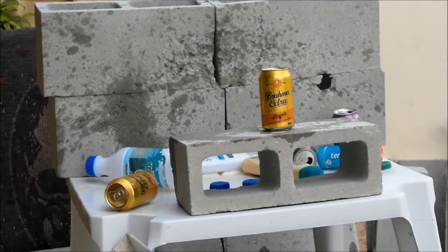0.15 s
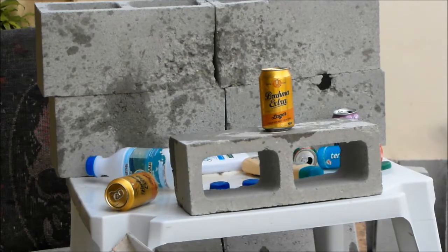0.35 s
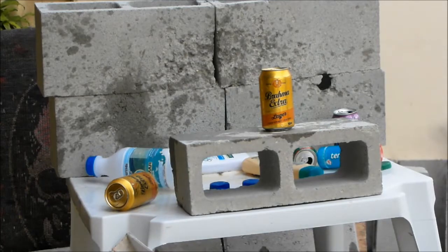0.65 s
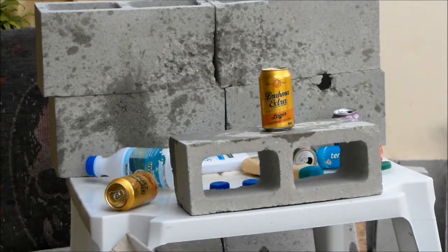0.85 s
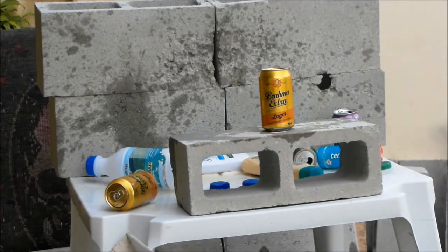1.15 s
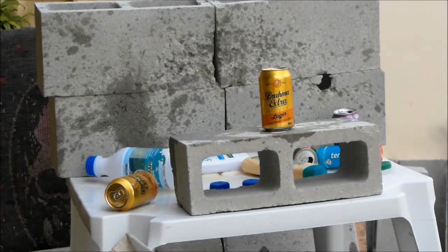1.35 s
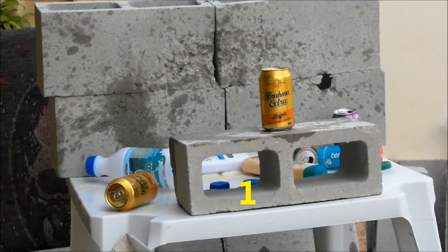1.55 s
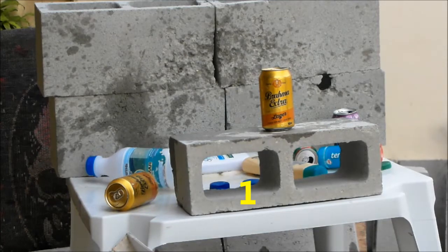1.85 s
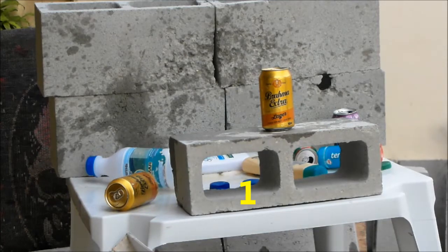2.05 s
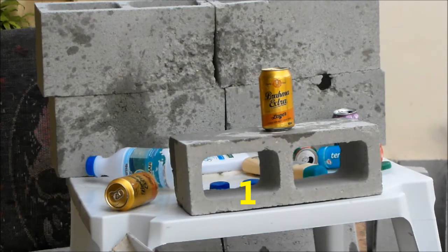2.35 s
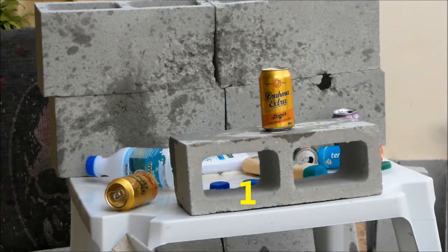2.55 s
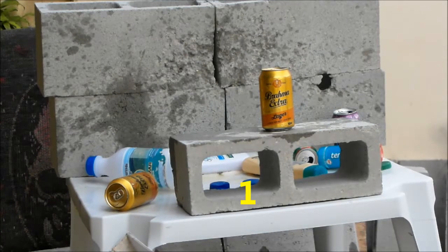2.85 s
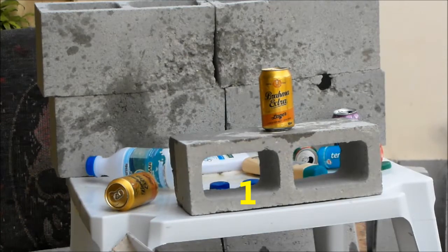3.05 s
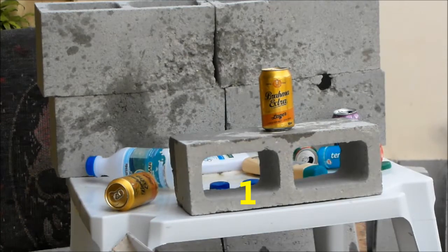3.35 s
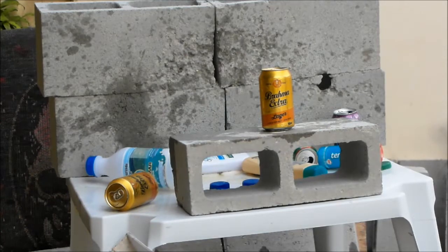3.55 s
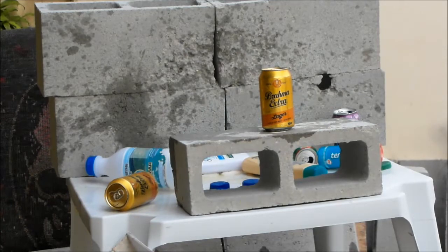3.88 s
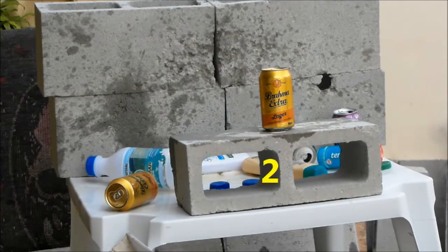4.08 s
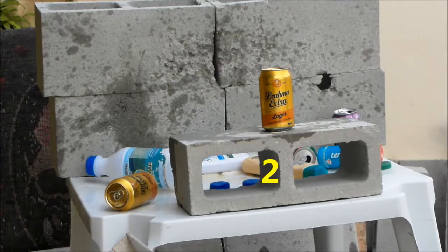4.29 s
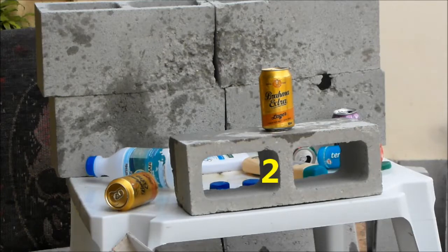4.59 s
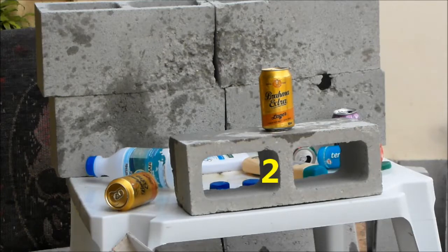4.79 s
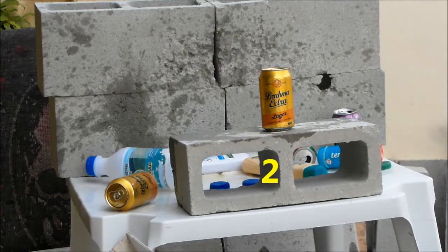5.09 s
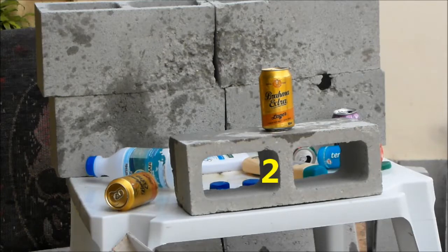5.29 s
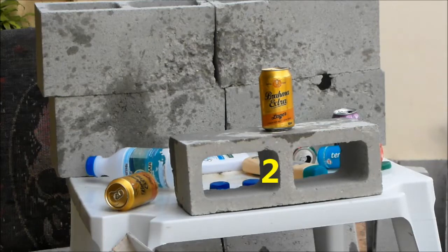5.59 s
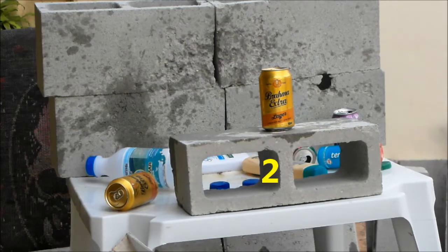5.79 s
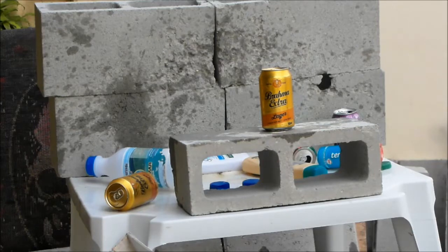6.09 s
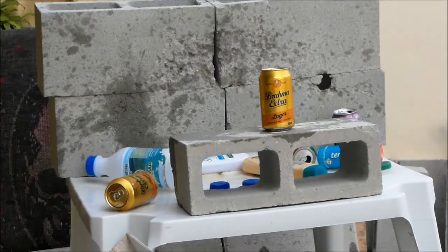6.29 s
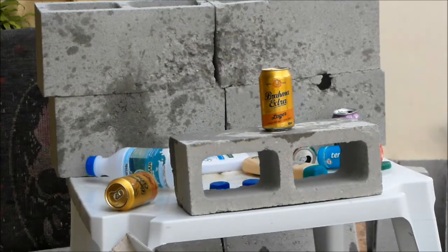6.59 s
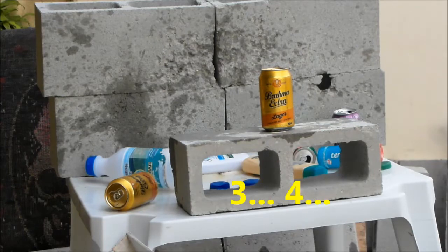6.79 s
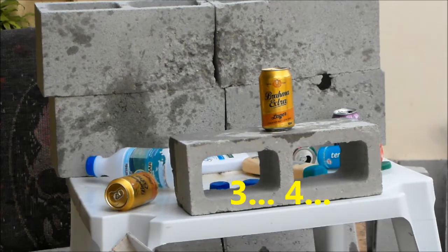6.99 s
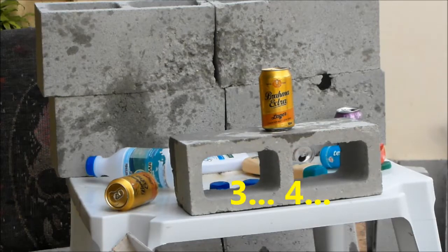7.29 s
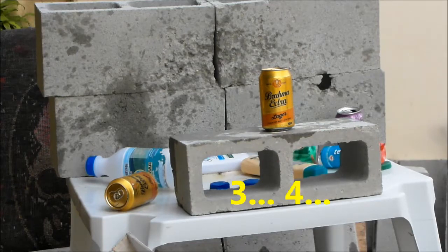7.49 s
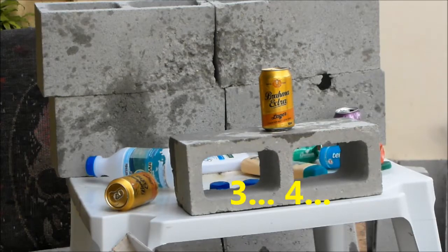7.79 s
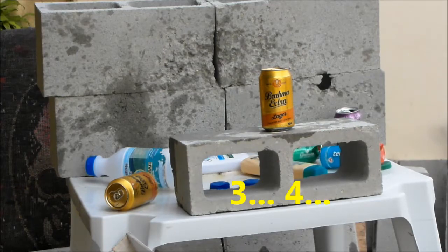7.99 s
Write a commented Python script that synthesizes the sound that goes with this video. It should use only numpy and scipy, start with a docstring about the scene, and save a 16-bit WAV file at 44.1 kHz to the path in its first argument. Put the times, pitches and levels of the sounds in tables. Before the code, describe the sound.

A quiet walled yard outdoors: soft traffic roar leaning slightly right, a low engine drone sinking in pitch, a faint hoot, and a sparrow chirp at 0.7 s. At 1.3 s a small steel click leads straight into a very loud, clipped air pistol crack with a short low punch, hissing gas, a gritty pellet hit and dense echoes off concrete, fading within under a second. A metal click comes at 2.3 s, a chirp at 2.8 s, and a barely audible thin whine joins the drone. The second shot and hit land at 4.1 s. The engine swells near 6 s. Clicks and dull knocks surround a third shot at 6.7 s; the fourth, brightest, strikes at 7.3 s with a metallic hit. From 7.5 s hard chips tick and an empty can clatters, crinkling and ringing in uneven bounces until the end at about 8.1 s.

```python
"""Street noise and a low engine drone come first, with faint hoots and sparrow chirps. An air pistol fires four
times in a walled concrete yard, close to a stereo microphone; the loudest moments clip flat; a thin whine joins
after the first shot. Each shot is a filtered pressure jump with dense echoes, a low punch, hissing gas and
cracks off flat walls. Metal parts tick as filtered noise bursts, three pellet hits splash and ring; near the
end small chips tick and an empty can tumbles as a set of fading sine tones."""
import sys
import numpy as np
from scipy import signal
from scipy.fft import rfft, irfft, next_fast_len
from scipy.io import wavfile
from scipy.ndimage import uniform_filter1d

SR = 44100
rng = np.random.default_rng(int(sys.argv[2]) if len(sys.argv) > 2 else 0)


def unload_audio(sound):
    """Save the sound as a 16-bit wav file, at the path given as the first command line argument."""
    columns = np.transpose(np.atleast_2d(sound))
    # keep every value between -1 and 1, then stretch to whole-number steps
    steps = np.round(np.clip(columns, -1, 1) * 32767)
    wavfile.write(sys.argv[1], SR, steps.astype(np.int16))


N = 358974
T = np.arange(N) / SR  # time in s
PRESSURE_JUMP = np.eye(1, 2048)[0]  # a single-sample click

# Spectrum shape of the muzzle blast and pellet cracks: pitch_hz, relative level_db (per Hz)
BLAST_SPECTRUM = [(35, -60), (60, -26.5), (205, -13.5), (247, -12), (376, -10.5), (442, -11), (485, -8.5),
                  (641, -12.5), (790, -6.5), (1230, -7.5), (2580, -7), (3410, -5.5), (6100, -9.5),
                  (9930, -4), (15400, -22)]
# Spectrum shape of clicking steel and crinkling can wall: pitch_hz, relative level_db (per Hz)
METAL_SPECTRUM = [(290, -57), (500, -26), (545, -32), (737, -17.5), (1040, -11.5), (3090, -6.5), (4620, -3),
                  (8570, 1.5), (14400, -5.5), (15400, -14.5)]
# Stereo balance of the yard: pitch_hz, left_minus_right_db
YARD_BALANCE = [(60, -3.5), (110, -4), (200, -3.5), (380, 0), (700, -1.5), (1290, 0), (2380, -1), (4400, 0),
                (8120, -4.0), (15000, -3.5)]


def undb(db):
    """Turns decibels into a plain gain."""
    return 10 ** (np.asarray(db) / 20)


def unit(x):
    """Scales a sound to an average (RMS) level of 1."""
    return x / np.sqrt(np.mean(x ** 2))


def add(track, start_s, x):
    """Mixes a sound into a track at a time, cutting what runs past the end."""
    i = min(int(start_s * SR), N)
    track[..., i:i + x.shape[-1]] += x[..., :N - i]


def on_log(hz, table):
    """Reads a (pitch, value) table along log frequency."""
    table_hz, values = np.transpose(table)[:2]
    return np.interp(np.log(np.maximum(hz, 1)), np.log(table_hz), values)


def colour(x, table, tilt_db=0):
    """Filters with a table's spectrum, tilted in dB per octave; the filter never sounds early."""
    hz = np.fft.rfftfreq(2048, 1 / SR)
    gain = undb(on_log(hz, table) + tilt_db * np.log2(np.maximum(hz, 50) / 2000))
    # folding the cepstrum (the transform of the log gain) packs the energy at the start
    cepstrum = irfft(np.log(gain))
    cepstrum[1:1024] *= 2
    cepstrum[1025:] = 0
    response = irfft(np.exp(rfft(cepstrum)))
    return signal.fftconvolve(x, response / np.sqrt(np.sum(response ** 2)))[:len(x)]


def burst(t60, size=4096):
    """Noise that starts at once and fades by 60 dB in t60 seconds, energy 1."""
    x = rng.standard_normal(size) * undb(-60 * T[:size] / t60)
    return x / np.sqrt(np.sum(x ** 2))


def crack(hz, cycles):
    """A sine that starts at once and dies by a factor e every few cycles, peak near 1."""
    turns = T[:512] * hz
    return np.sin(2 * np.pi * turns) * np.exp((.25 - turns) / cycles)


def ring(modes, centre_hz, octaves):
    """A blow on a body: tones near the centre answer most, a little differently each time."""
    hz, db, t60 = np.transpose(modes)[:, :, None]
    level_chance, pitch_chance = rng.standard_normal((2, len(hz), 1))
    t = T[:16384]
    # a mode that lies the given octaves from the centre is 6 dB weaker
    distance = np.log2(hz / centre_hz) / octaves
    gain = undb(db + 2 * level_chance - 6 * distance ** 2 - 60 * t / t60)
    tones = np.sin(2 * np.pi * hz * (1 + 0.0039 * pitch_chance) * t)
    return np.sum(gain * tones, axis=0)


def walk(rate):
    """Random levels held 1 / rate seconds and smoothed twice; spread near 1."""
    hold = int(SR / rate)
    steps = np.repeat(rng.standard_normal(N // hold + 1), hold)
    return 1.3 * uniform_filter1d(uniform_filter1d(steps, hold), hold)[:N]


def pair(size, balance):
    """Spectra of left and right noise, alike in the bass, unrelated in the treble."""
    # Likeness of left and right: pitch_hz, likeness (0 to 1)
    likeness = [(60, 0.66), (130, 1), (290, 0.83), (640, 0.87), (1410, 0.78), (3100, 0.53), (6810, 0.06),
                (15000, 0.01)]
    hz = np.fft.rfftfreq(size, 1 / SR)
    same = np.clip(on_log(hz, likeness), 0, 1)
    mid, side = rfft(rng.standard_normal((2, size)))
    sign = np.array([[1], [-1]])
    noise = mid * np.sqrt((1 + same) / 2) + sign * side * np.sqrt((1 - same) / 2)
    return hz, noise * undb(sign * on_log(hz, balance) / 2)


def yard(x, size=32768):
    """Dense echoes between hard walls: each half octave dies at its own pace, near walls first."""
    # How long the echoes last: pitch_hz, t60_s (time to fade by 60 dB)
    echo_times = [(80, 0.19), (250, 0.35), (600, 0.64), (1500, 0.61), (4000, 0.8), (8000, 0.69),
                  (14000, 0.47)]
    early_db, early_share = 2, 0.36  # near walls: strength, and their fade as a share of the yard's
    fill_s, fill_start = 0.018, 0.64  # the echoes thicken at this pace, from this share
    hz, noise = pair(size, YARD_BALANCE)
    echoes, t = 0, T[:size]
    for centre in 40 * np.sqrt(2) ** np.arange(19):
        share = np.clip(1 - np.abs(2 * np.log2(np.maximum(hz, 1) / centre)), 0, 1)
        t60 = on_log(centre, echo_times)
        fade = undb(-60 * t / t60) + undb(early_db - 60 * t / t60 / early_share)
        echoes = echoes + irfft(noise * share) * fade
    thickening = 1 - (1 - fill_start) * np.exp(-t / fill_s)
    return signal.fftconvolve(x[None], echoes * thickening, axes=1)


def street():
    """Traffic roar made of noise octaves that flicker on their own, over a smooth hiss."""
    # Roar level over time: time_s, level_db
    roar_levels = [(0, -55.5), (.84, -59), (1.9, -54), (3.2, -56.5), (4.1, -56.5), (4.8, -52), (6.6, -51.5),
                   (8.14, -60.5)]
    # Spectrum shape of the roar: pitch_hz, relative level_db (per Hz)
    roar_spectrum = [(21, -29.5), (35, -5), (70, -6), (120, -11), (226, -17), (551, -18), (852, -18),
                     (922, -17.5), (1920, -25), (2590, -27.5), (4000, -36), (5200, -63), (8800, -120)]
    # Spectrum shape of the hiss: pitch_hz, relative level_db (per Hz)
    hiss_spectrum = [(880, -28), (1500, -6), (2860, -8.5), (3210, -6), (4390, -7), (6170, -7.5), (7140, -8),
                     (13700, -9), (15400, -17)]
    # Stereo balance of the street: pitch_hz, left_minus_right_db
    street_balance = [(60, 2), (110, -0.5), (200, -2), (380, 0.5), (700, -0.5), (1290, 0.5), (2380, 0.5),
                      (4400, 0.5), (8120, -1), (15000, 1.5)]
    size = next_fast_len(N)
    hz, noise = pair(size, street_balance)
    roar = 0
    for centre in 30 * 2. ** np.arange(8):
        share = np.clip(1 - np.abs(np.log2(np.maximum(hz, 1) / centre)), 0, 1)
        octave = irfft(noise * share * undb(on_log(hz, roar_spectrum)), size)[:, :N]
        roar = roar + octave * undb(1.2 * walk(6))
    hz, noise = pair(size, street_balance)
    hiss = irfft(noise * undb(on_log(hz, hiss_spectrum)), size)[:, :N]
    roar_gain = undb(np.interp(T, *np.transpose(roar_levels)))
    return unit(roar) * roar_gain + unit(hiss) * undb(-62)


def engine():
    """A low firing tone and its overtones at whole multiples, all wavering."""
    # The engine over time: time_s, firing_hz, level_db
    engine_course = [(0, 68.6, -58), (.3, 66, -64), (.6, 47.26, -59.5), (1.2, 38.2, -61), (1.8, 38.55, -67),
                     (2.5, 43.1, -72), (2.75, 44.05, -58), (3.201, 48.8, -58.5), (3.8, 52.23, -58.5),
                     (4.02, 53.4, -50), (4.501, 55.2, -59.5), (5.17, 55.92, -59.5), (5.92, 51.74, -46),
                     (6.14, 51.9, -52), (6.32, 47.6, -45), (6.57, 43, -53), (7.19, 46.07, -53.5),
                     (8.14, 48.5, -49.5)]
    # Firing tone and its overtones in order: relative level_db
    overtones = [1, -13.5, -15, -25.5, -22.5]
    s, hz, db = np.transpose(engine_course)
    phase = 2 * np.pi * np.cumsum(np.interp(T, s, hz) * (1 + .01 * walk(9.3))) / SR
    tone = 0
    for k, order_db in enumerate(overtones):
        tone = tone + undb(order_db + 1.2 * walk(12.0)) * np.sin((k + 1) * phase)
    return np.sqrt(2) * tone * undb(np.interp(T, s, db))


def whine():
    """A thin sine above the drone, wavering in pitch and level."""
    # The whine over time: time_s, pitch_hz, level_db
    whine_course = [(2.5, 220, -75.5), (3.2, 232, -70.5), (4, 243, -72.5), (5.5, 248, -80), (6.3, 251, -65),
                    (7, 250, -76), (8.14, 252, -69)]
    s, hz, db = np.transpose(whine_course)
    phase = 2 * np.pi * np.cumsum(np.interp(T, s, hz) * (1 + 0.0033 * walk(8))) / SR
    level_db = np.interp(T, s, db, left=-120) + 2.5 * walk(1.7)
    return np.sqrt(2) * np.sin(phase) * undb(level_db)


def hoots():
    """Soft short sine tones that swell and fade unevenly."""
    # Faint far hoots: start_s, level_db (peak, before the unevenness), pitch_hz, length_s
    hoot_list = [(.02, -59, 452, .08), (3.37, -64, 423, .2), (5.543, -56.5, 346, 0.091)]
    out = np.zeros(N)
    for s, db, hz, length in hoot_list:
        t = T[:int(length * SR)]
        add(out, s, undb(db) * np.sin(np.pi * t / length) * np.sin(2 * np.pi * hz * t))
    return out * undb(1.8 * walk(32))


def sparrow():
    """Short whistles: sines that glide downward and rise faster than they fade."""
    # Chirps: start_s, level_db (peak), start_hz, end_hz, length_s
    chirp_list = [(.69, -59, 4800, 4500, .018), (.706, -50, 5300, 3400, .03), (1.16, -72, 3700, 3690, .08),
                  (2.762, -59, 5500, 3300, .026), (4.8, -71, 3660, 3650, .2)]
    out = np.zeros(N)
    for s, db, start_hz, end_hz, length in chirp_list:
        progress = np.arange(int(length * SR)) / (length * SR)
        hz = end_hz + (start_hz - end_hz) * (1 - progress) ** 1.3
        swell = np.sin(np.pi * progress ** 0.4)
        add(out, s, undb(db) * swell * np.sin(2 * np.pi * np.cumsum(hz) / SR))
    return out


def chips():
    """Small hard bits tick on concrete as very short dying sines."""
    # Chips and spent pellets dropping: start_s, level_db (peak), pitch_hz, fade_cycles
    chip_list = [(7.5166, -19, 5500, 3), (7.5435, -19, 1500, 1), (7.7110, -22, 5800, 3),
                 (7.7486, -9, 9000, 1.5), (7.8411, -26, 5000, 2)]
    out = np.zeros(N)
    for s, db, hz, cycles in chip_list:
        add(out, s, undb(db) * crack(hz, cycles))
    return out


def can():
    """Every bounce rings the thin shell, crinkles its wall and adds two loose taps."""
    # Bounces: start_s, level_db, centre_hz of the tones shaken, spread_octaves, crinkle_db
    bounce_list = [(7.5435, -29.5, 2390, 0.36, -20), (7.64, -42, 1280, 0.4, -19),
                   (7.7733, -32, 2724, 0.35, -13), (7.8821, -44, 1710, 2.04, -17.5),
                   (7.9724, -35.5, 2550, 0.55, -16), (8.0169, -47.5, 1463, 0.53, -20.5),
                   (8.076, -47.5, 1410, 0.43, -28.5), (8.1189, -32.5, 2840, 0.54, -18.5)]
    # Tones of the can's shell: pitch_hz, relative level_db, t60_s
    shell_modes = [(1017, 0, .22), (1276, -1, .22), (1335, -9, .1), (1405, -1, .25), (1730, -4, .1),
                   (1900, -5, .08), (2010, -6, .09), (2132, -4, .08), (2315, -8, .08), (2652, -9, .07),
                   (3160, -9, .06), (3300, -8, .06), (3540, -4, .08), (3670, -1, .07), (4980, -10, .07)]
    out = np.zeros(N)
    for s, db, centre_hz, octaves, crinkle_db in bounce_list:
        add(out, s, undb(db) * ring(shell_modes, centre_hz, octaves))
        add(out, s, undb(crinkle_db) * colour(burst(0.074), METAL_SPECTRUM))
        for late, weakness in rng.random((2, 2)):
            tap = ring(shell_modes, centre_hz, 0.96 * octaves)
            add(out, s + 0.093 * late, undb(db - 3.5 - 4.4 * weakness) * tap)
    return out


def pellets():
    """Hits: a splash of grit heard straight, and a crack with ringing metal sent to the walls."""
    # Pellets arriving: start_s, echo_db, brightness_db (per octave), ring_db (relative to the echo),
    # ring_centre_hz, ring_spread_octaves, splash_db
    hit_list = [(1.368, -19, -1.5, -21.5, 1130, 0.41, 22.5), (4.135, -28.5, 1, -26, 3150, 1.6, 24),
                (7.305, -16.5, 2.5, -30.5, 4460, 0.55, 23.5)]
    # Tones of the struck metal: pitch_hz, relative level_db, t60_s
    target_modes = [(1040, -9, .05), (1150, -5, .1), (1712, 7, .1), (2500, -6, .04), (3165, -2, .04),
                    (3435, -1, .04), (3784, -3, .04), (5440, 0, .05), (5520, 5, .09), (6060, -5, .03)]
    near, far = np.zeros((2, N))
    for s, db, bright_db, ring_db, centre_hz, octaves, splash_db in hit_list:
        splash = colour(burst(0.25, size=8192), BLAST_SPECTRUM, bright_db)
        add(near, s, undb(splash_db) * splash)
        add(far, s, undb(db) * colour(PRESSURE_JUMP, BLAST_SPECTRUM, bright_db))
        add(far, s, undb(db + ring_db) * ring(target_modes, centre_hz, octaves))
    return near, far


def ticks():
    """Steel parts click and rattle briefly; returns the near sound and what reaches the walls."""
    # Metal parts of the pistol: start_s, level_db, dullness_db (per octave), t60_s,
    # echo_db (relative to the level)
    tick_list = [(1.296, -25, 3, 0.068, -24.5), (1.306, -19.5, -1.5, 0.034, -27),
                 (2.3102, -24.5, 1, 0.12, -3.5), (4.064, -20.5, 0, 0.061, -33.5),
                 (6.633, -21, 1, 0.094, -28.5), (6.645, -28, 3.5, 0.074, -42),
                 (6.661, -30, 0.5, 0.054, -41.5), (7.235, -21.5, 2, 0.061, -47)]
    # Dull knocks inside the grip as the hammer moves: start_s, level_db
    knock_list = [(6.660, -37), (6.669, -30), (6.678, -29.5)]
    # Tones of the grip: pitch_hz, relative level_db, t60_s
    grip_modes = [(429, -8, 0.038), (610, 3, 0.094), (810, -11, .035), (1200, -21, .03)]
    near, far = np.zeros((2, N))
    for s, db, dull_db, t60, echo_db in tick_list:
        add(near, s, undb(db) * colour(burst(t60), METAL_SPECTRUM, -dull_db))
        add(far, s, undb(db + echo_db) * colour(PRESSURE_JUMP, METAL_SPECTRUM, -dull_db))
    for s, db in knock_list:
        add(near, s, undb(db) * ring(grip_modes, 620, 3))
    return near, far


def shots():
    """A pressure jump fills the yard, the barrel punches low, spare gas hisses out, walls slap back."""
    # Shots: start_s, blast_db (before the 6 dB boost below), thump_db (bass of the spectrum),
    # brightness_db (treble of the spectrum), gas_db (relative to blast_db), gas_swell_s (its pace),
    # punch_db (relative to blast_db, before the 2.5 dB boost below)
    shot_list = [(1.3311, -16, 9, -7.5, 18.5, 0.026, 10), (4.0974, -16.5, 5.5, 0, 16, 0.034, 10),
                 (6.6986, -19.5, 5.5, -4.5, 22, 0.03, 14.5), (7.2656, -14.5, 7, 1.5, 16, 0.031, 8)]
    # Spectrum shape of the escaping gas: pitch_hz, relative level_db (per Hz)
    gas_spectrum = [(300, -29.5), (1000, -12.5), (3000, -4), (6000, -5.5), (10000, 2), (15500, -12.5)]
    # Lone echoes of the muzzle crack from flat walls: delay_s, level_db (peak)
    slap_list = [(.0585, -4), (.0684, -2), (.0782, -6), (.0858, -3), (.095, -7), (.1135, 1), (.142, -13)]
    out, t = np.zeros((2, N)), T[:16384]
    for s, db, thump_db, bright_db, gas_db, swell, punch_db in shot_list:
        shape = []
        for hz, level_db in BLAST_SPECTRUM:
            tone_db = np.interp(np.log(hz), np.log([400, 1500, 5000]), [thump_db, 0, bright_db])
            shape.append((hz, level_db + tone_db))
        # each shot draws fresh yard noise, so its dense echoes differ in detail
        add(out, s, undb(db + 6) * yard(colour(PRESSURE_JUMP, shape)))

        hz, noise = pair(len(t), YARD_BALANCE)
        gas = unit(irfft(noise * undb(on_log(hz, gas_spectrum))))
        swelling = (0.16 + t / swell) * np.exp(-t / swell * 1.135)
        add(out, s, gas * undb(db + gas_db) * swelling)

        for delay, hz in [(0, 686), (.005, 437), (.015, 550)]:  # barrel, then floor and wall
            punch_gain = undb(db + punch_db + 2.5 - 60 * t / 0.016)
            add(out, s + delay, punch_gain * np.sin(2 * np.pi * hz * t))
        for delay, slap_db in slap_list:
            add(out, s + delay, undb(slap_db) * crack(6500, 1.))
    return out


def scene():
    """Mixes the street, the yard's echoes, the near sounds and the shots."""
    # The street lies to the right: one gain for left, one for right
    right_lean = np.array([[.92], [1.08]])
    steel, steel_far = ticks()
    grit, hits = pellets()
    bits, tin, bird = chips(), can(), sparrow()
    background = right_lean * (street() + engine() + whine() + hoots())
    to_walls = steel_far + hits + undb(-34.5) * bits + undb(-33.5) * tin + undb(-29.5) * bird
    near = steel + grit + bits + tin + bird
    return background + yard(to_walls)[:, :N] + near + shots()


def record(dry):
    """Drops the deepest bass, turns bass down under loud sound, clips flat and cuts the top."""
    duck_hz, duck_from_db, duck_most_db = 82.5, -40.5, 17  # band edge, threshold, greatest cut
    smoothing_s = 0.035  # how slowly the loudness reading follows, up and down
    thin = signal.sosfilt(signal.butter(2, 32, "high", fs=SR, output="sos"), dry)
    keep = np.exp(-1 / (smoothing_s * SR))
    power = signal.lfilter([1 - keep], [1, -keep], np.mean(thin ** 2, axis=0))
    loud_db = 10 * np.log10(power + 1e-12)
    bass = signal.sosfiltfilt(signal.butter(2, duck_hz, fs=SR, output="sos"), thin)
    bass_gain = undb(-np.clip(loud_db - duck_from_db, 0, duck_most_db))
    ducked = thin - bass * (1 - bass_gain)
    top_cut = signal.ellip(8, .2, 70, 15300, fs=SR, output="sos")  # edge at 15300 Hz
    return signal.sosfilt(top_cut, np.clip(ducked, -.9, .9))


dry = scene()
out = record(dry)
unload_audio(out)
```